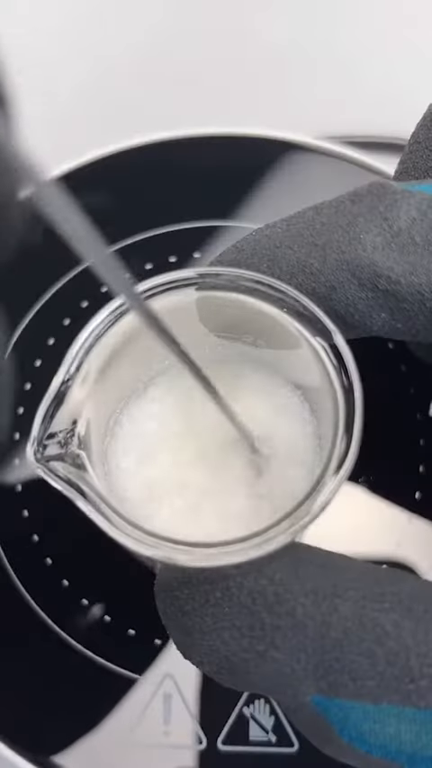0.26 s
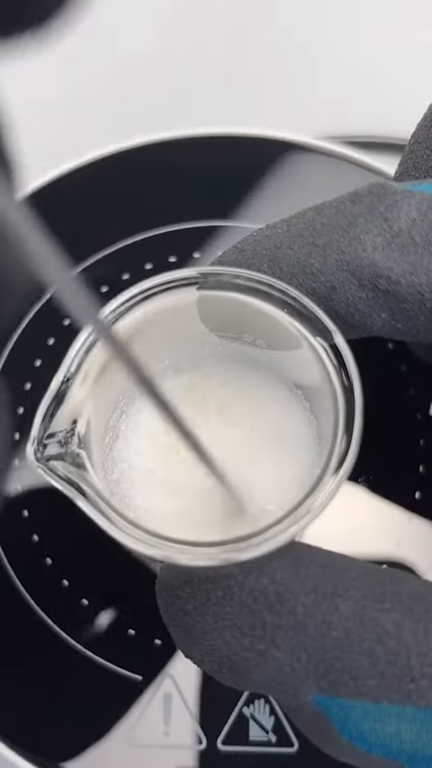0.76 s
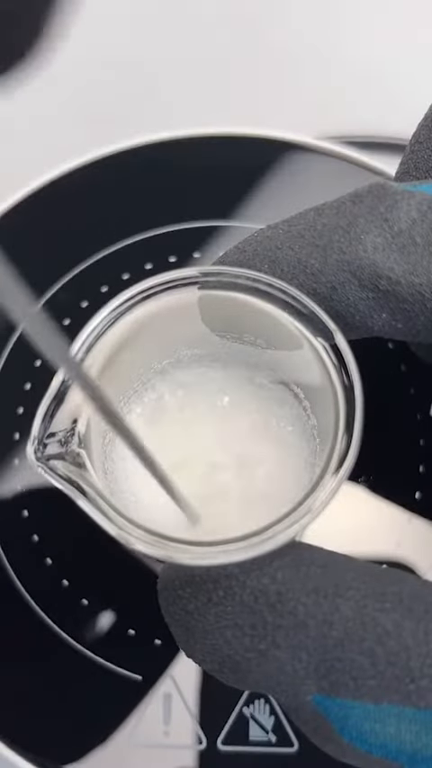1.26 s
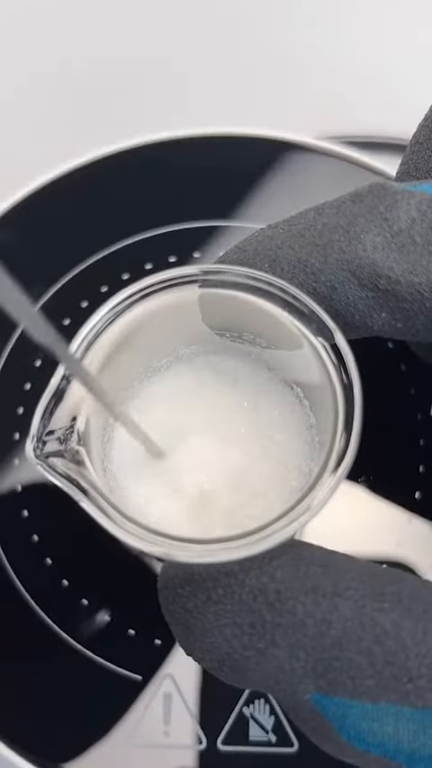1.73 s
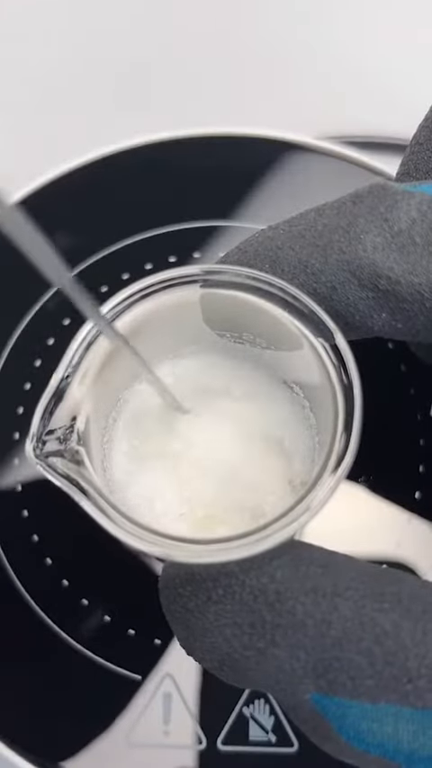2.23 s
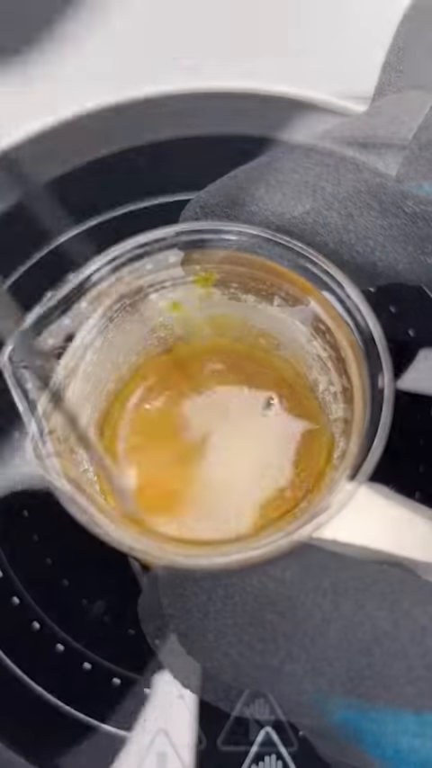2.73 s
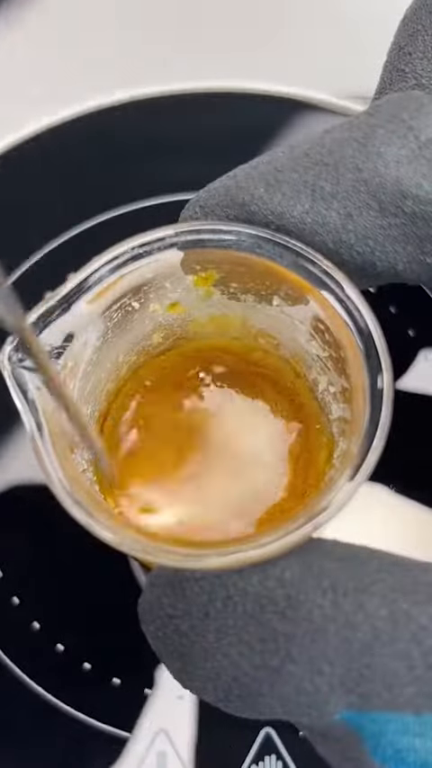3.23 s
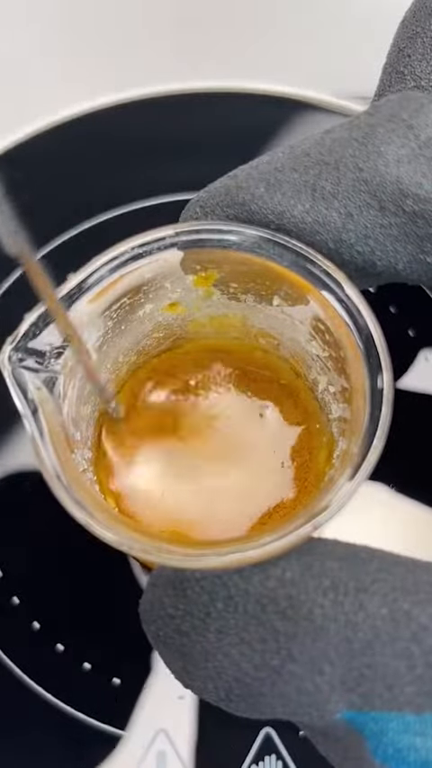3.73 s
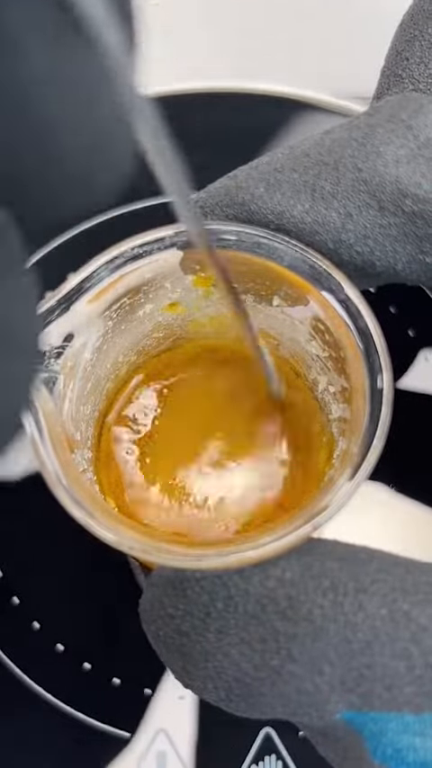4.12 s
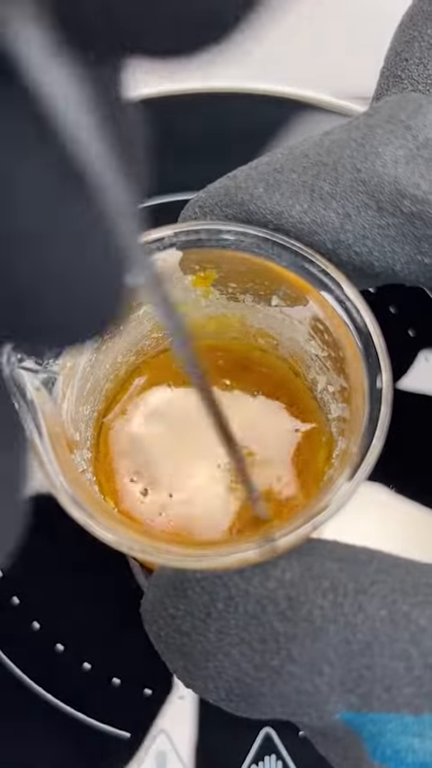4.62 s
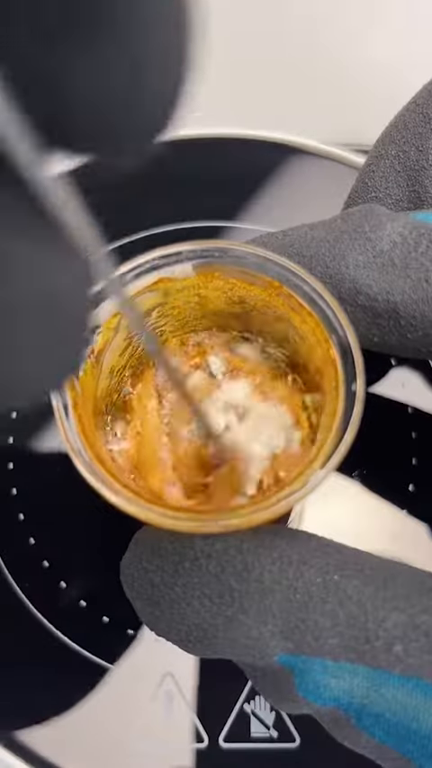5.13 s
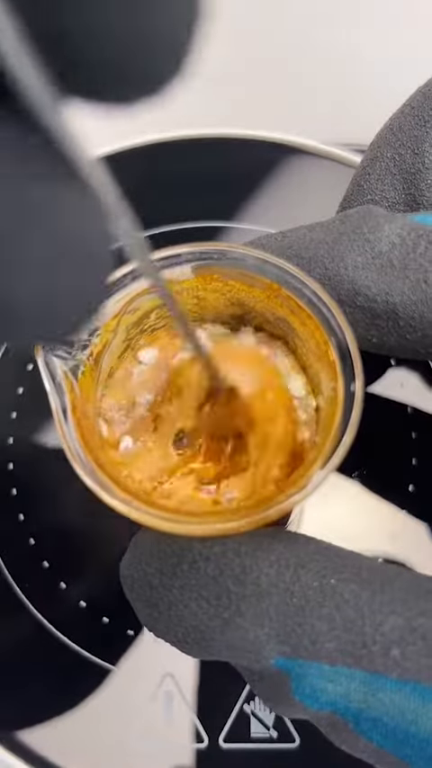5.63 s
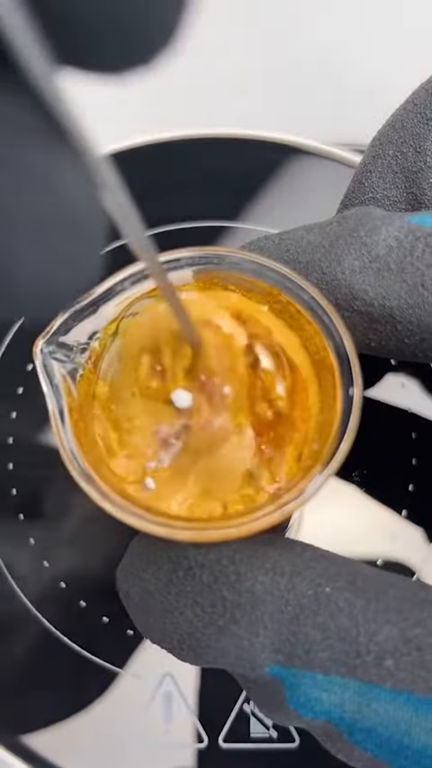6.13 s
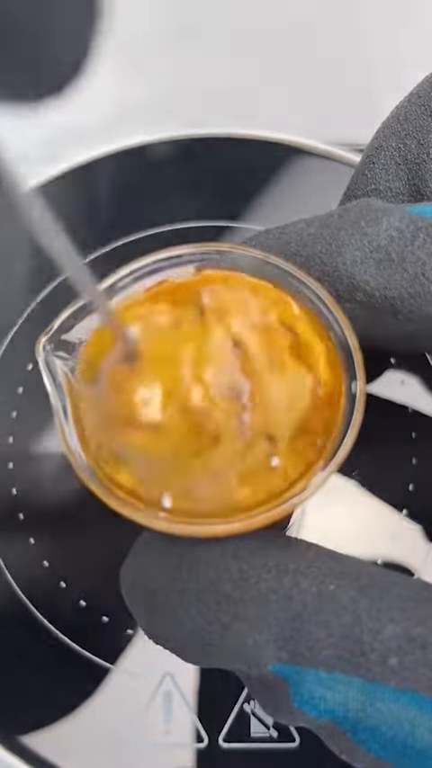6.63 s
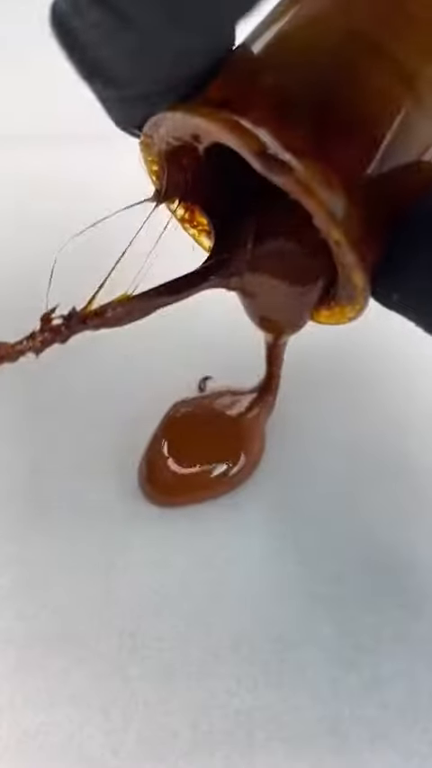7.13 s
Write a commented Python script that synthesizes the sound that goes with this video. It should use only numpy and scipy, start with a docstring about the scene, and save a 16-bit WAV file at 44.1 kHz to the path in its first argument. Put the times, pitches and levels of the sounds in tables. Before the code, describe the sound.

Close-up stirring in a small glass beaker: dry granular rasping, busy glassy taps, then dull sticky knocks above an appliance drone, ending nearly silent.

```python
"""A thin steel rod stirs a glass beaker on a hot plate, close by: first dry sugar, then runny melt, then thick
caramel over a humming appliance; at last the caramel is poured in near silence.
Rubbing is modal and shaped noise, its grain set by slips and crushed crystals; knocks are damped glass modes
with noise clacks and cracks. The bench adds low noise and decaying sines; hum, squeaks and plops are tones."""
import sys
import numpy as np
from scipy import signal
from scipy.fft import rfft, irfft, next_fast_len
from scipy.io import wavfile
from scipy.ndimage import uniform_filter1d, map_coordinates

SR = 44100
rng = np.random.default_rng(int(sys.argv[2]) if len(sys.argv) > 2 else 0)


def bounce(signal):
    """Save signal as a 16-bit WAV file at the path given by the first command-line argument."""
    frames = np.transpose(np.atleast_2d(signal))
    limited = np.clip(frames, -1, 1)
    pcm = np.round(limited * 32767).astype(np.int16)
    wavfile.write(sys.argv[1], SR, pcm)


N = 324576

# Stage starts, sugar, melt, caramel, pouring: start_s
STAGE_START_S = [0, 2.453, 5.099, 7.03]
# Stereo spread, per stage: freq_hz, side_over_mid_db
SIDE_DB = [
    [(60, -58), (380, -12.5), (1300, -85), (2400, -33), (4400, -7), (9000, -6.5)],
    [(80, -80), (380, -11.5), (1300, -58.5), (2400, -20), (4400, -2.5), (9000, -5)],
    [(60, -62), (200, -30), (600, -9), (1300, -11), (2400, -49), (4400, -10), (9000, -5)],
    [(100, -61), (380, -1), (1300, 2.5), (2400, -25), (9000, -0.5)],
]
# Contact build-up, per stage (loose sugar cushions): build_s
CONTACT_S = [0.0077, .0009, 0.00038, .001]

# Room tone: freq_hz, relative_db_per_hz
AIR_SPECTRUM = [(20, -28), (110, -8), (190, 4.5), (420, -12), (800, -9), (1200, -27.5), (3000, -27.5),
                (8000, -47)]
AIR_RMS_DB = -65.5
# Appliance hum: time_s, fundamental_rms_db, octave_rms_db
HUM = [(5.1, -36.5, -53), (5.33, -38, -52), (5.4, -36.5, -43), (5.8, -33.5, -46), (6.08, -33, -37),
       (6.2, -33.5, -62.5), (7.03, -32, -52)]
HUM_HZ, HUM_WAVER_HZ = 55.8, 0.4
# Short room tail: freq_hz, t60_s
ROOM = [(200, 0.32), (2000, 0.043), (10000, 0.11)]
# Bench rumble, per stage: freq_hz, relative_db_per_hz
BENCH = [
    [(13, -59), (22, -21), (48, -3), (96, -0.5), (269, -8.5), (330, -7), (487, -20.5), (700, -17.5),
     (910, -10.5), (1540, -120)],
    [(13, -45), (22, -47), (42, -7), (87, -0.5), (144, -1), (258, -20), (335, -19.5), (460, -33.5),
     (606, -27.5), (700, -40), (910, -47), (1540, -120)],
    [(41, -13), (70, -2.5), (86, -7), (119, 0.5), (162, -6), (529, -26), (700, -33), (910, -31.5),
     (1540, -120)],
    [(13, -46), (22, -1), (118, 4.5), (273, -9), (307, -16), (460, -19.5), (700, -47), (910, -66),
     (1540, -120)],
]
# Bench rumble level: time_s, level_db
RUMBLE = [(0.0, -47.5), (0.61, -44.5), (0.9, -49.5), (1.0, -46), (2.38, -48), (2.52, -31), (2.64, -39.5),
          (2.77, -31.5), (2.92, -39), (2.96, -51), (3.02, -42), (3.05, -32), (3.81, -40), (3.87, -26.5),
          (4.18, -43.5), (4.35, -31), (4.63, -44.5), (4.67, -37.5), (4.86, -46), (4.92, -31.5),
          (5.04, -43.5), (5.94, -49), (6.05, -38.5), (6.19, -49.5), (6.27, -35), (6.44, -44.5), (6.5, -43),
          (6.58, -44), (7.03, -40), (7.05, -46.5), (7.11, -36.5), (7.36, -38)]
# Plate mode, one row per stage: mode_hz, width_hz, gain_db
PLATE = [(94, 150, 0.5), (87.4, 15, 4.5), (84, 4.9, -3), (121, 8.1, 3)]
# Beaker shifts on the plate: start_s, relative_db, pitch_hz, t60_s
THUMPS = [(2.746, -23.5, 92.5, 0.27), (3.141, -35.5, 87.5, 1.1), (3.316, -24, 58, 0.27),
          (3.43, -29.5, 89.2, .8), (3.87, -28, 95, 0.23), (3.9, -24, 58.2, 0.43), (6.038, -31, 78, .09),
          (6.266, -29.5, 85.5, 0.081), (6.503, -31, 75, .09)]
# Bench modes a knock jolts: mode_hz, relative_db, t60_s
BENCH_MODES = [(96.9, -13, 0.3), (136, -20.5, 0.044), (62, -20, 0.09), (223, -11.5, 0.055)]
JOLT_DB = -4.5  # over the knock
# Low swells and soft thuds, some under knocks: center_s, length_s, pitch_hz, level_db
SWELLS = [(1.394, 0.061, 232, -47), (2.51, 0.014, 300, -39.5), (2.744, 0.019, 297, -51),
          (3.77, 0.021, 310, -39), (3.896, .02, 298, -43), (4.664, 0.01, 302, -53),
          (4.907, 0.014, 295, -36), (5.038, 0.056, 314, -52), (5.344, 0.011, 308, -47),
          (5.978, 0.016, 352, -48), (6.038, 0.026, 296, -53), (6.31, 0.081, 406, -52),
          (6.386, .02, 360, -46), (6.452, 0.023, 300, -45), (6.657, 0.02, 328, -50),
          (6.771, 0.03, 298, -49), (6.946, 0.067, 428, -51), (7.247, 0.035, 420, -48),
          (7.296, 0.059, 447, -53)]
SWELL_WIDTH_RATIO = 0.39  # of the pitch

# Thick caramel lets go of the rod: start_s, relative_db
PLOPS = [(6.061, -34.5), (6.201, -38.5), (6.219, -33), (6.294, -28.5), (6.724, -22)]
PLOP_HIGH_HZ, PLOP_LOW_HZ, PLOP_FALL_S, PLOP_T60_S, PLOP_PUFF_DB = 2360, 404, 0.00143, 0.025, -9.5
# Rod tip snaps on crust: start_s, relative_db
TICKS = [(0.5322, -32), (1.226, -32), (2.492, -24), (2.5071, -16), (2.5902, -25), (2.7467, -18.5),
         (2.8537, -32), (2.883, -32), (2.92, -26), (2.95, -32), (2.9684, -21.5), (3.078, -37),
         (3.2762, -19.5), (3.5502, -16), (3.6693, -32), (3.688, -29), (3.7606, -34.5), (3.853, -22),
         (4.016, -36), (4.1697, -17.5), (4.316, -34), (4.33, -22.5), (4.4243, -35), (4.5047, -18.5),
         (4.6549, -32.5), (4.7094, -32), (4.7338, -24), (4.9042, -23.5), (5.085, -28), (5.168, -33),
         (5.286, -33), (5.3135, -19), (5.3323, -28), (5.5602, -24), (5.6138, -29), (5.746, -30),
         (5.9536, -24), (5.9685, -15.5), (6.2025, -21.5), (6.3743, -25), (6.4927, -8.5), (6.5492, -23),
         (6.726, -35)]
# Snap colour, before and with the caramel: freq_hz, gain_db
TICK_COLOUR = [
    [(4000, -12.5), (7000, -11.5), (11000, 1.5), (13000, -7.5), (15500, -21), (16500, -35)],
    [(4000, -14.5), (8000, -15.5), (11800, -15.5), (14000, -10), (16500, -30.5)],
]
# Snap decay, per stage, before contact build-up lengthens it: t60_s
TICK_T60_S = [0.063, 0.015, 0.02, .011]
# Rod grips, glass rings up without a click: center_s, length_s, pitch_hz, level_db
SQUEAKS = [(2.647, 0.0046, 970, -25), (3.119, 0.012, 970, -32.5), (3.226, 0.014, 970, -27),
           (3.827, 0.011, 987, -32), (4.268, 0.0064, 920, -38), (4.377, 0.0055, 973, -25.5),
           (4.487, 0.019, 990, -38.5), (5.024, 0.0081, 966, -32), (5.057, 0.0067, 974, -28),
           (5.074, 0.0057, 980, -38)]

# Rod on glass: start_s, relative_db, ring_hz, crack_relative_db
KNOCKS = [(0.159, -34, 975, -12), (0.21, -29.5, 950, -10), (0.236, -26, 795, -11), (0.268, -28.5, 1150, -2),
          (0.383, -36, 950, -16), (0.533, -22.5, 970, -15), (0.612, -40, 1020, -20),
          (1.013, -24.5, 1177, -16), (1.049, -26, 896, -10), (1.084, -28, 926, -16),
          (1.105, -38, 1026, -14), (1.12, -26, 942, -11), (1.198, -29, 1000, -18), (1.232, -21, 925, -23),
          (1.313, -34, 1100, -24), (1.431, -37.5, 1025, 1), (1.525, -38.5, 850, -19),
          (1.564, -26, 1080, -8), (1.612, -30, 918, -23), (1.737, -27.5, 1113, -22), (2.05, -35, 1360, -15),
          (2.312, -28, 1050, -10), (2.389, -29, 975, -19), (2.421, -32, 860, -22), (2.455, -30, 940, -27),
          (2.491, -24.5, 1070, -4), (2.507, -19.5, 890, -2), (2.537, -25, 960, -25), (2.567, -31, 969, -5),
          (2.721, -11, 1040, -17), (2.75, -18, 1030, -16), (2.784, -23, 1050, -11),
          (2.854, -26.5, 1020, -4), (2.878, -28.5, 1040, -0.5), (2.921, -23.5, 1880, -8.5),
          (3.028, -32, 890, -31), (3.078, -26.5, 900, -4), (3.147, -23, 890, -28), (3.176, -28, 945, -8),
          (3.203, -17, 995, -32), (3.213, -49.5, 920, -11), (3.249, -18.5, 1120, -27),
          (3.273, -26, 930, -10), (3.303, -18.5, 1024, -37), (3.319, -27.5, 1026, -27),
          (3.357, -27, 1040, -37), (3.55, -25.5, 2010, -9), (3.669, -18, 980, -9), (3.694, -24, 1060, -7),
          (3.704, -19, 1060, -19), (3.725, -27, 950, -1), (3.751, -26, 970, -19), (3.762, -12.5, 890, -8),
          (3.854, -17, 1037, -28), (3.878, -17, 1020, -28), (3.892, -15.5, 1060, -25),
          (3.906, -31.5, 1040, -21), (3.925, -23.5, 1060, -23), (3.937, -29, 1010, -12),
          (3.946, -22.5, 980, -8), (3.959, -32, 980, -6), (3.967, -21, 1050, -3), (3.993, -25, 970, -9),
          (4.017, -19, 1760, -5.5), (4.169, -28.5, 1030, -17), (4.297, -25, 1020, -24),
          (4.317, -18, 990, -25), (4.33, -27, 1120, -1.5), (4.344, -38, 1070, -35), (4.353, -31, 980, -33),
          (4.372, -25, 1010, -17), (4.426, -19.5, 990, -11), (4.443, -19, 990, -22),
          (4.459, -33, 1050, -18), (4.473, -27, 1070, -10), (4.482, -33, 990, -12), (4.507, -38, 1000, -16),
          (4.638, -27, 970, -20), (4.656, -18.5, 970, -7), (4.71, -25.5, 1900, -8), (4.734, -24, 2350, -23),
          (4.759, -26, 880, -4), (4.898, -21, 920, -9), (4.904, -18.5, 940, 4), (4.925, -21.5, 980, -5),
          (4.941, -28, 1140, -3), (4.946, -17, 960, -25), (4.965, -22, 1010, -33), (4.987, -25, 960, -17),
          (5.104, -43, 990, -9), (5.159, -20, 1380, -17.5), (5.331, -15, 1230, -9.5), (5.385, -46, 1400, 7),
          (5.524, -25.5, 2050, -16), (5.561, -28.5, 1250, -16), (5.568, -30.5, 1270, -22),
          (5.579, -47, 1300, -22), (5.512, -41, 1520, -2), (5.631, -43, 2300, 4),
          (5.646, -20.5, 1410, -14.5), (5.695, -41, 1350, -14), (5.724, -43, 1330, -14),
          (5.746, -53, 1400, -6), (5.763, -34, 1370, -18), (5.776, -44, 1500, 2), (5.79, -36, 1480, -12),
          (5.801, -34, 1400, -14), (5.815, -40.5, 1300, -1), (5.825, -41, 1400, -14),
          (5.884, -44, 1540, -2), (5.968, -40, 1724, -7), (6.015, -36, 1300, -25), (6.027, -44, 1360, -27),
          (6.032, -31, 1160, -30), (6.037, -38, 1300, -30), (6.044, -30.5, 1150, -25),
          (6.047, -35, 1260, -22), (6.111, -32.5, 1350, -16), (6.245, -13.5, 1350, -26),
          (6.252, -24.5, 1260, -25), (6.259, -24, 1250, -21), (6.278, -30.5, 1294, -12),
          (6.375, -14.5, 1370, -12), (6.447, -40, 1510, -24.5), (6.491, -22, 1605, 3.5),
          (6.493, -8, 1304, -18.5), (6.644, -35.5, 3170, -9.5), (6.665, -45, 1300, -12),
          (6.695, -27.5, 1230, -24), (6.999, -30.5, 1100, -37)]
# Glass modes: ring_multiple, relative_db, t60_share
WALL = [(1, 6, 0.96), (1.45, -36, 0.77), (1.9, 4, 0.36), (2.7, -32, 1), (4.3, -10.5, 0.38)]
# Ring; sugar, melt, caramel: t60_cycles (before build-up), sharp_start_ratio, settle_s, clack_db, rough_rad
RING = [(7, 0.47, 0.0011, -3, 0.2), (10.2, 0.3, 0.00072, 9, 0.1), (8.2, 0.66, 0.00043, 12, 0.053)]
# Two rebounds; sugar, melt, caramel: typical_flight_s, loss_db
REBOUNDS = [(0.01, -16), (.006, -18.5), (0.0046, -15)]
LEAD_DB, LEAD_S = -22.5, 0.0031  # light touch ahead of the knock
REBOUND_DULL_DB = -7.5  # a rebound clacks and cracks less than it rings
CLACK_FOLLOWS = 0.26  # share of the crack dB: harder contacts also clack more
# Crack colour; sugar, melt, caramel: freq_hz, gain_db
CRACK_COLOUR = [
    [(700, 10), (1200, 14), (2000, 3), (3200, 11), (4500, 1.5), (9000, -4), (16000, -35)],
    [(700, 11), (1200, 9.5), (2100, 13), (2700, 4.5), (3250, -6), (3800, 2.5), (4500, 12), (5100, -1.5),
     (6000, -1), (9000, -14), (16000, -38.5)],
    [(700, 8), (1300, 15), (2400, 11), (2850, 8), (3250, 14.5), (4400, 7.5), (6000, 0.5), (9000, -22),
     (16000, -29.5)],
]
CRACK_PATCHY_DB = 3
# Dry answer of the whole beaker; sugar, melt, caramel: mode_hz
CLACK_HZ = [2050, 2030, 2390]
# Small beaker radiates little below; sugar, melt, caramel: corner_hz
SMALL_HZ = [585, 617, 960]
SOFT_HZ = 7000  # the contact is too slow to ring the glass above this

# Rod drags along glass: start_s, length_s, rub_db, hiss_db (before the layer trims)
SCRAPES = [(0.227, 0.12, -55, -55), (0.25, 0.044, -60, -58), (0.358, 0.067, -44, -54),
           (0.503, 0.063, -45.5, -54), (0.602, 0.039, -49.5, -51), (0.927, 0.096, -49, -55.5),
           (1.098, 0.056, -43, -50.5), (1.197, 0.06, -46, -52.5), (1.316, 0.02, -45, -50),
           (1.407, 0.017, -65, -84), (1.54, 0.02, -47.5, -52.5), (1.697, 0.095, -49, -57.5),
           (1.965, 0.075, -52, -55), (2.155, 0.2, -50.5, -59.5), (2.378, 0.16, -47, -52.5),
           (2.478, 0.023, -40, -64), (2.569, 0.078, -42, -48), (2.634, 0.025, -43.5, -59),
           (2.673, 0.19, -47, -51.5), (2.926, 0.086, -62.5, -51.5), (3.065, 0.083, -45.5, -58),
           (3.187, 0.012, -47.5, -53.5), (3.217, 0.021, -37, -45), (3.286, 0.062, -51.5, -64),
           (3.37, 0.061, -64, -92), (3.543, 0.067, -54, -58), (3.686, 0.042, -37.5, -53),
           (3.793, 0.038, -41, -57.5), (3.865, .17, -51.5, -60.5), (4.167, 0.055, -56.5, -54),
           (4.224, 0.026, -51.5, -61), (4.314, 0.034, -38.5, -51), (4.369, 0.01, -55, -47),
           (4.411, 0.072, -40, -54.5), (4.526, 0.055, -61.5, -67), (4.652, 0.058, -58.5, -61),
           (4.723, 0.05, -60, -47.5), (4.806, 0.046, -52, -61), (4.898, 0.071, -45.5, -52.5),
           (5.002, .02, -47.5, -55), (5.038, 0.011, -35.5, -52), (5.16, 0.065, -56.5, -86),
           (5.238, 0.046, -59, -61), (5.328, 0.034, -49, -56), (5.382, 0.043, -53, -55.5),
           (5.487, 0.025, -63, -63), (5.556, 0.021, -48.5, -68), (5.74, 0.1, -64, -57),
           (5.8, 0.026, -50, -53), (5.946, 0.033, -64, -55.5), (6.014, 0.039, -47, -64),
           (6.27, 0.057, -61, -59.5), (6.39, 0.067, -52.5, -62), (6.495, 0.059, -48, -55),
           (6.647, 0.02, -87, -55), (6.68, 0.055, -54, -79), (7, 0.014, -56, -71), (7.11, 0.01, -62, -92),
           (7.125, .01, -61.5, -86.5)]
# Scrape envelope, one row per stage: attack_s, release_s
SCRAPE_SHAPE = [(0.046, 0.03), (0.02, 0.027), (0.017, 0.023), (.01, 0.016)]
# Between scrapes, one row per stage: rub_db, grit_db, hiss_db (before the layer trims)
REST = [(-51.5, -59, -57.5), (-66, -79, -73), (-61, -60, -58.5), (-74, -81.5, -79)]
# Scrape grit lies between hiss and rub, one row per stage: offset_db, rub_share
GRIT_LAW = [(-1.5, 0.15), (-5, 0.31), (1, 0.14), (-9, 0.26)]
RUB_TRIM_DB, GRIT_TRIM_DB, HISS_TRIM_DB = -4, 2.5, 2.0
# Rubbed glass modes, per stage: mode_hz, width_hz, relative_db
RUB = [
    [(963, 236, 16), (1770, 205, 13)],
    [(930, 630, -10), (1880, 280, -11), (1250, 120, -21)],
    [(1310, 330, -5.5), (1930, 690, -9.5), (2430, 67, -8)],
    [(1750, 770, 0)],
]
# Grit, per stage: freq_hz, relative_db_per_hz
GRIT = [
    [(1350, -4.5), (2300, -2.5), (3930, -3), (4860, -10), (6140, -1.5), (7040, 0.5), (9000, -17.5),
     (11700, -37), (19800, -120)],
    [(1350, -16), (2300, 12.5), (3430, -2.5), (4540, 3), (5030, -9), (5800, 2.5), (6650, -3), (9000, -9),
     (11700, -34), (19800, -120)],
    [(1350, -6), (2300, 0.5), (3590, 2.5), (5870, -5), (6350, -17.5), (7450, 0.5), (9000, -40),
     (11700, -30), (19800, -120)],
    [(1350, -24), (2300, -4), (4720, -8), (6390, -10), (9000, -7), (11700, -19), (19800, -120)],
]
# Hiss, per stage: freq_hz, relative_db_per_hz
HISS = [
    [(5000, -29), (8500, 2), (8960, -17), (9850, 10.5), (11300, 14.5), (12500, -9), (15700, -101),
     (16300, -34), (16500, -66)],
    [(5000, 8), (8500, 0.5), (9210, -9), (10100, 19), (11000, 18.5), (13200, -3), (15400, -79),
     (16100, -24), (16500, -37)],
    [(5000, -16.5), (8500, 6), (10700, 8), (11800, -23), (12500, -14), (13100, 13.5), (14000, 12),
     (16000, 0), (16500, -19)],
    [(5000, -36.5), (8500, -3), (11700, -13), (14800, 8), (16100, -15), (16500, -28.5)],
]
# Unevenness of rod slip, per stage: relative_spread_db
GRAINS_DB = [1.68, 2.4, 1, 0.8]
# Crushed crystals, one row per stage: rate_per_s, over_smooth_rub_db
CRYSTALS = [(753, -17), (332, -10), (204, -1), (101.6, -8)]
# Random patchiness over time and frequency; rub, grit, hiss: spread_db
PATCHY_DB = 3, 2, 1.5
# Dragged rod skips, one row per stage: rate_per_s, spread_db, upper_modes_over_rub_db
CHATTER = [(290.5, 3, -13), (168.6, 8, -9), (119.5, 10, -11), (60, 5, -20)]
# Upper modes a skip rings, per stage: mode_hz, width_hz, relative_db
SKIP_MODES = [
    [(1710, 500, 0), (3200, 1330, -6.5)],
    [(1925, 240, 1.5), (2500, 270, -9), (3940, 150, -1.5), (4290, 190, -2)],
    [(2350, 500, 5.5), (3400, 680, 3), (4800, 900, -14)],
    [(2000, 900, 0)],
]
# Lowest glass mode sings, one row per stage: center_hz, width_hz, over_firm_rub_db
SING = [(1047, 590, -4), (968, 174, 0.5), (1340, 800, -2), (1810, 790, -18)]
# Glide as the rod moves round the wall: time_s, contour_hz (divided by its mean over the whole scene)
SING_PITCH = [(0.0, 947), (0.34, 1050), (0.37, 990), (1.21, 974.2), (1.55, 1036), (1.67, 956.3),
              (1.73, 1046), (1.87, 912.8), (2.0, 1002), (2.53, 1012), (2.66, 958.4), (2.7, 1025),
              (2.88, 1033), (3.01, 916.7), (3.44, 1042), (3.61, 906.7), (3.64, 996.8), (3.78, 963),
              (3.88, 1034), (4.08, 1025), (4.2, 961.4), (4.7, 1039), (4.73, 920.3), (4.83, 903),
              (4.87, 999), (5.1, 975.2)]
SKIP_SHARE = 0.64  # of the singing drive; the rest is smooth friction
SING_GROWS, FIRM_DB = 0.23, -40.5  # extra dB per rub dB over the firm rub
TOP_HZ = 16700


def amp(db):
    """Amplitude ratio of a dB value."""
    return 10 ** (np.asarray(db) / 20)


def unit(x):
    """x scaled to rms 1."""
    return x / np.sqrt(np.mean(x ** 2) + 1e-20)


def along(points, hz):
    """Interpolate (Hz, value) points on a log-frequency axis."""
    f, v = np.transpose(points)
    return np.interp(np.log(hz + 1), np.log(f + 1), v)


def curves(rows):
    """One value per sample for each column after the time."""
    s, *cols = np.transpose(rows)
    return [np.interp(np.arange(N) / SR, s, c) for c in cols]


def wobble(knots_per_s):
    """Smooth random curve."""
    knots = rng.standard_normal(int(N * knots_per_s / SR) + 4)
    return map_coordinates(knots, [np.arange(N) * knots_per_s / SR])


def add(out, start, x):
    """Mix x into out from sample start."""
    out[start:][:len(x)] += x


def filtered(x, response):
    """x times a complex response of frequency."""
    m = next_fast_len(N + SR // 2)
    return irfft(rfft(x, m) * response(np.fft.rfftfreq(m, 1 / SR)), m)[..., :N]


def mode(f, hz, width_hz):
    """One causal resonance of peak gain 1."""
    return 1j * f * width_hz / (hz * hz - f * f + 1j * f * width_hz)


def modes(rows):
    """Response of a sum of resonances of alternating sign."""
    return lambda f: sum((-1) ** i * amp(db) * mode(f, hz, width) for i, (hz, width, db) in enumerate(rows))


def noise(spectrum, side_db, lumps=1, body=np.ones_like):
    """Mid and side noise of a spectrum, mid at rms 1; the gain lumps roughens both."""
    def response(f):
        return amp(along(spectrum, f)) * body(f) * [f ** 0, amp(along(side_db, f))]
    pair = filtered(lumps * rng.standard_normal((2, N)), response)
    return pair / np.std(pair[0])


def patchy(x, spread_db):
    """Random patches of gain over time and frequency."""
    z = signal.stft(x, nperseg=256)[2]
    field = uniform_filter1d(rng.standard_normal(z.shape[-2:]), size=3, axis=0)
    field = uniform_filter1d(field, size=7, axis=1)
    gain = amp(spread_db * unit(field))
    return signal.istft(z * unit(gain), nperseg=256)[1][..., :N]


def stage(k):
    """1 while stage k lasts, with short cross-fades."""
    t, edges = np.arange(N) / SR, [-1] + STAGE_START_S[1:] + [N]
    fade_in = np.clip((t - edges[k]) / 0.02 + .5, 0, 1)
    fade_out = np.clip((edges[k + 1] - t) / 0.0125 + .5, 0, 1)
    return fade_in * fade_out


def stage_at(s):
    """Index of the stage at time s."""
    return np.searchsorted(STAGE_START_S, s) - 1


def coloured(x, parts, colours):
    """Each part of x through its own (Hz, dB) colour."""
    return sum(filtered(part * x, lambda f: amp(along(colour, f))) for part, colour in zip(parts, colours))


def contact(s, t):
    """First sample, build-up seconds and rise of a contact at time s."""
    build_s = CONTACT_S[stage_at(s)]
    return round((s - build_s / 2) * SR), build_s, 1 - np.exp(-(t / build_s) ** 2)


def air():
    """Steady room tone: shaped noise."""
    return amp(AIR_RMS_DB) * noise(AIR_SPECTRUM, SIDE_DB[-1])


def hum():
    """An appliance hums through the bench during the caramel: wavering fundamental and octave."""
    db, octave_db = curves(HUM)
    phase = 2 * np.pi * np.cumsum(HUM_HZ + HUM_WAVER_HZ * wobble(4.9)) / SR
    fundamental = amp(db + 0.2 * wobble(6.2)) * np.sin(phase)
    octave = amp(octave_db + 1.9 * wobble(6.5)) * np.sin(2 * phase + 2.47 + 0.4 * wobble(6.1))
    return np.sqrt(2) * stage(2) * (fundamental + octave)


def room(x):
    """Near surfaces answer briefly, as mid and side: decaying noise convolved with x."""
    hz, t, z = signal.stft(rng.standard_normal((2, SR // 4)), SR, nperseg=256)
    decay = amp(-60 * t / along(ROOM, hz)[:, None])
    tail = signal.istft(z * decay, SR, nperseg=256)[1]
    delayed = np.pad(x, (90, 0))[None]
    wet = signal.fftconvolve(delayed, tail / np.linalg.norm(tail[0]), axes=1)[:, :N]
    wet[1] = filtered(wet[1], lambda f: amp(along(SIDE_DB[1], f) - 12.0))
    return wet


def rumble():
    """Plate and bench rumble with the force of the stirring: low noise plus a plate mode."""
    out, level = np.zeros((2, N)), amp(curves(RUMBLE)[0])
    for k, (spectrum, (hz, width, db)) in enumerate(zip(BENCH, PLATE)):
        plate = lambda f: 1 + amp(db) * mode(f, hz, width)
        out += level * stage(k) * noise(spectrum, SIDE_DB[k], amp(0.43 * wobble(34)), plate)
    return out


def thumps():
    """The beaker shifts on the plate: softly starting, decaying low sines."""
    t, out = np.arange(SR // 2) / SR, np.zeros(N)
    for s, db, hz, t60 in THUMPS:
        envelope = amp(db + 5.5 - 60 * t / t60) * (1 - np.exp(-t / 0.013)) * (1 - t / t[-1])
        add(out, round(s * SR), envelope * np.sin(2 * np.pi * hz * t))
    return out


def jolts():
    """Each knock jolts the bench modes."""
    t, out = np.arange(SR // 5) / SR, np.zeros(N + SR)
    for s, db, *_ in KNOCKS:
        start = contact(s, t)[0]
        for hz, level_db, t60 in BENCH_MODES:
            envelope = amp(db + JOLT_DB + level_db - 60 * t / t60) * (1 - np.exp(-t / 0.0046))
            add(out, start, envelope * np.sin(2 * np.pi * hz * t))
    return out[:N]


def swells():
    """Low swells and soft thuds, some under knocks: puffs of noise, each around its own pitch."""
    t, out = np.arange(-SR // 8, SR // 8) / SR, np.zeros(N + SR)
    f = np.fft.rfftfreq(len(t), 1 / SR)
    for s, length, hz, db in SWELLS:
        puff = rng.standard_normal(len(t))
        band = unit(irfft(rfft(puff) * mode(f, hz, SWELL_WIDTH_RATIO * hz) ** 2, len(t)))
        add(out, round((s + t[0]) * SR), amp(db) * np.exp(-2 * (t / length) ** 2) * band)
    return out[:N]


def plops():
    """Thick caramel lets go of the rod: a short falling blip with a puff of noise."""
    t, out = np.arange(SR // 20) / SR, np.zeros(N + SR)
    pitch_hz = PLOP_LOW_HZ + (PLOP_HIGH_HZ - PLOP_LOW_HZ) * np.exp(-t / PLOP_FALL_S)
    tone = np.sin(2 * np.pi * np.cumsum(pitch_hz) / SR)
    for s, db in PLOPS:
        start, _, rise = contact(s, t)
        puff = uniform_filter1d(rng.standard_normal(len(t)), size=4)
        envelope = amp(db + 1.5 - 60 * t / PLOP_T60_S) * rise
        add(out, start, envelope * (tone + amp(PLOP_PUFF_DB) * puff))
    return out[:N]


def ticks():
    """The rod tip snaps on crust: bright noise bursts, higher once the caramel has set on the wall."""
    t, snaps = np.arange(SR // 20) / SR, np.zeros(N + SR)
    for s, db in TICKS:
        start, build_s, rise = contact(s, t)
        t60 = TICK_T60_S[stage_at(s)] + 3 * build_s
        snap = amp(db + 3.5 - 60 * t / t60) * rise * rng.standard_normal(len(t))
        add(snaps, start, snap)
        add(snaps, start - round(.0025 * SR), amp(-12.5) * snap)  # the crust gives a little first
    early = stage(0) + stage(1)
    return coloured(snaps[:N], (early, 1 - early), TICK_COLOUR)


def squeaks():
    """The rod grips and the glass rings up: a slightly rough swelling tone with a weak upper mode."""
    t, out = np.arange(-SR // 20, SR // 20) / SR, np.zeros(N + SR)
    for s, length, hz, db in SQUEAKS:
        phase = 2 * np.pi * hz * t + 0.065 * np.cumsum(rng.standard_normal(len(t)))
        tone = np.sin(phase) + amp(-24.0) * np.sin(1.7 * phase)
        add(out, round((s + t[0]) * SR), amp(db) * np.exp(-(t / length) ** 2) * tone)
    return out[:N]


def wall_ring(t, hz, t60, sharp, settle_s, rough_rad):
    """Damped glass modes, starting sharp and settling as the rod leaves the wall."""
    sag = 1 + sharp * np.exp(-t / settle_s)
    wander = rough_rad * np.cumsum(rng.standard_normal(len(t)))  # random phase wander roughens the ring
    out = np.zeros(len(t))
    for multiple, level_db, share in WALL:
        phase = 2 * np.pi * np.cumsum(hz * multiple * sag) / SR + wander
        out += amp(level_db + 0.13 * rng.standard_normal() - 60 * t / (t60 * share)) * np.sin(phase)
    return out


def radiated(x, hz):
    """High-pass of the small beaker."""
    return filtered(x, lambda f: mode(f, hz, 1.2 * hz) ** 2 * (1j * f / (1.345 * hz)) ** 2)


def knocks():
    """Contacts ring the filled glass, clack and crack; a light touch leads, two rebounds follow."""
    t, lead = np.arange(SR // 5) / SR, round(LEAD_S * SR)
    ring, clack, crack = np.zeros((3, N + SR))
    for s, db, hz, crack_db in KNOCKS:
        start, build_s, rise = contact(s, t)
        cycles, sharp, settle_s, clack_db, rough_rad = RING[stage_at(s)]
        body = rise * wall_ring(t, hz, cycles / hz + 4 * build_s, sharp, settle_s, rough_rad)
        clack_level_db = clack_db + CLACK_FOLLOWS * crack_db
        clack_burst = amp(clack_level_db - 60 * t / (0.013 + 4 * build_s)) * rise * rng.standard_normal(len(t))
        crack_burst = amp(crack_db + 1.5 - 60 * t / (0.014 + 4 * build_s)) * rise * rng.standard_normal(len(t))

        flight_s, loss_db = REBOUNDS[stage_at(s)]
        flights = flight_s * SR * np.exp(0.35 * rng.standard_normal(2))
        first, second = np.cumsum(flights).astype(int)
        touches = [(start, db, 0), (start - lead, db + LEAD_DB, 0),
                   (start + first, db + loss_db, REBOUND_DULL_DB),
                   (start + second, db + 1.5 * loss_db, REBOUND_DULL_DB)]
        for at, touch_db, dull_db in touches:
            add(ring, at, amp(touch_db - 1.63) * body)
            add(clack, at, amp(touch_db + dull_db) * clack_burst)
            add(crack, at, amp(touch_db + dull_db) * crack_burst)

    filled = stage(0), stage(1), stage(2) + stage(3)
    crack = coloured(patchy(crack[:N], CRACK_PATCHY_DB), filled, CRACK_COLOUR)
    clack = sum(filtered(part * clack[:N], lambda f: mode(f, hz, 620) ** 2)
                for part, hz in zip(filled, CLACK_HZ))
    ring = filtered(ring[:N], lambda f: (1 + 1j * f / SOFT_HZ) ** -2)
    return sum(radiated(part * (ring + clack + crack), hz) for part, hz in zip(filled, SMALL_HZ))


def scrapes():
    """Gains of rub, grit and hiss: a rest level per stage; each scrape rises, holds and dies away."""
    power = sum(stage(k) * amp(rest)[:, None] ** 2 for k, rest in enumerate(REST))
    t = np.arange(-SR // 20, SR // 2) / SR
    for s, length, rub_db, hiss_db in SCRAPES:
        k = stage_at(s)
        (attack, release), (offset_db, share) = SCRAPE_SHAPE[k], GRIT_LAW[k]
        grit_db = offset_db + share * rub_db + (1 - share) * hiss_db
        shape = np.clip(t / attack + .5, 0, 1) ** 2 * np.exp(-2 * np.clip(t - length, 0, 1) / release)
        span = power[:, round((s + t[0]) * SR):][:, :len(t)]
        span += amp([rub_db, grit_db, hiss_db])[:, None] ** 2 * shape[:span.shape[1]]
    return np.sqrt(power)


def friction(k, rub, grit, hiss):
    """One gritty stream of slips and crushed crystals excites glass, grit and hiss."""
    rate, crystal_db = CRYSTALS[k]
    slip = 2 * np.tanh((wobble(45) + 0.87 * wobble(170)) / 2)  # slips have a largest size
    slip_db = GRAINS_DB[k] * slip
    crushed = unit((rng.random(N) < rate / SR) * amp(9.7 * rng.random(N) ** 2))
    gritty = 1 + amp(crystal_db) * unit(uniform_filter1d(crushed, size=24))

    rub_noise = noise([(1, 0)], SIDE_DB[k], amp(slip_db) * gritty, modes(RUB[k]))
    grit_lumps = amp(0.97 * slip_db + 1.2 * wobble(60)) * gritty ** 0.56
    grit_noise = noise(GRIT[k], SIDE_DB[k], grit_lumps)
    hiss_noise = noise(HISS[k], SIDE_DB[k], amp(1.6 * slip_db) * gritty ** 0.59)

    layer = rub * amp(RUB_TRIM_DB) * patchy(rub_noise, PATCHY_DB[0])
    layer += grit * amp(GRIT_TRIM_DB) * patchy(grit_noise, PATCHY_DB[1])
    layer += hiss * amp(HISS_TRIM_DB) * patchy(hiss_noise, PATCHY_DB[2])
    return layer


def skipping(k):
    """The dragged rod skips on the glass: random pulses of uneven size."""
    rate, spread_db, _ = CHATTER[k]
    pulses = (rng.random(N) < rate / SR) * amp(spread_db * np.tanh(rng.standard_normal(N)))
    return unit(uniform_filter1d(pulses, size=40))


def singing(k, rub, skips):
    """The lowest glass mode sings under skips and friction: narrow noise on a gliding carrier."""
    hz, width, sing_db = SING[k]
    smooth = unit(amp(4.0 * np.tanh(wobble(60))))
    drive = SKIP_SHARE * skips + (1 - SKIP_SHARE) * smooth
    cosine, sine = filtered(drive * rng.standard_normal((2, N)), lambda f: (1 + 2j * f / width) ** -2)
    glide, = curves(SING_PITCH)
    pitch_hz = hz * glide / glide.mean() * (1 + 0.03 * wobble(40))
    phase = 2 * np.pi * np.cumsum(pitch_hz) / SR
    sing = cosine * np.cos(phase) + sine * np.sin(phase)
    return rub * (rub / amp(FIRM_DB)) ** SING_GROWS * amp(sing_db) * unit(sing)


def stirring():
    """The rod drags over crystals: friction noise, skip-rung upper modes and the singing wall."""
    rub, grit, hiss = scrapes()
    out = np.zeros((2, N))
    for k in range(len(STAGE_START_S)):
        layer, skips = friction(k, rub, grit, hiss), skipping(k)
        upper = unit(filtered(skips * rng.standard_normal(N), modes(SKIP_MODES[k])))
        layer[0] += rub * amp(CHATTER[k][2]) * upper
        layer[0] += singing(k, rub, skips)
        out += stage(k) * layer
    return out


def scene():
    """Mix mid and side, then decode to left and right."""
    glass = plops() + ticks() + squeaks() + knocks()
    mid, side = air() + rumble() + amp(-14.5) * room(glass) + stirring()
    mid = mid + hum() + thumps() + jolts() + swells() + glass
    return np.array([mid + side, mid - side])


def record(dry):
    """Nothing is kept above the band limit."""
    return filtered(dry, lambda hz: hz < TOP_HZ)


dry = scene()
out = record(dry)
bounce(out)
```